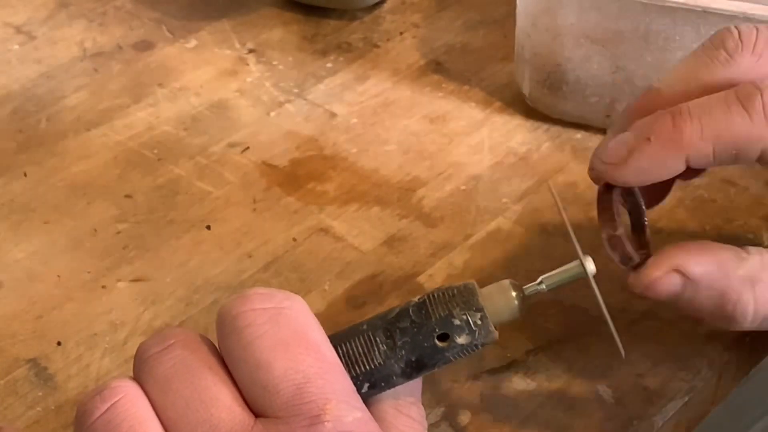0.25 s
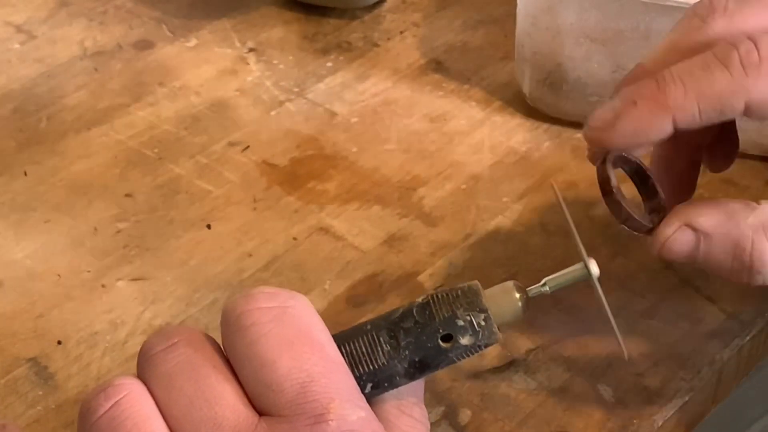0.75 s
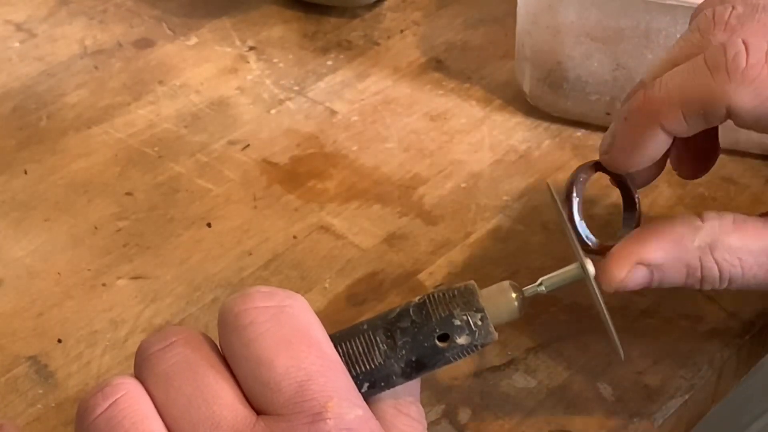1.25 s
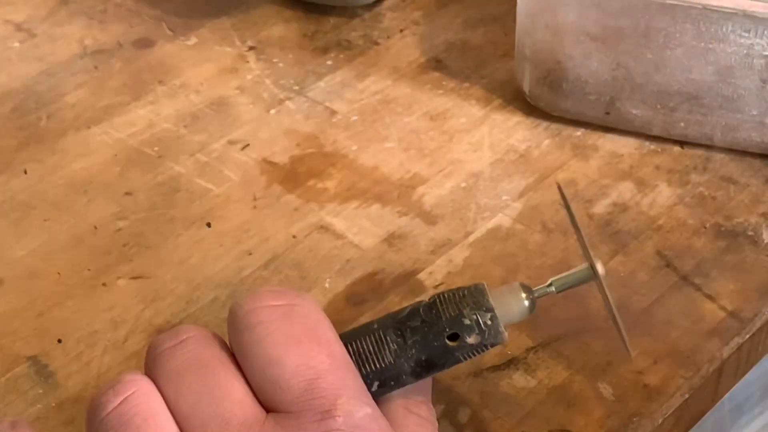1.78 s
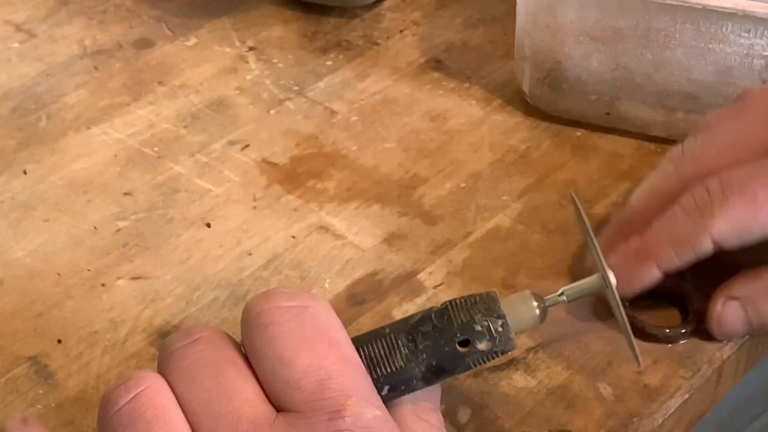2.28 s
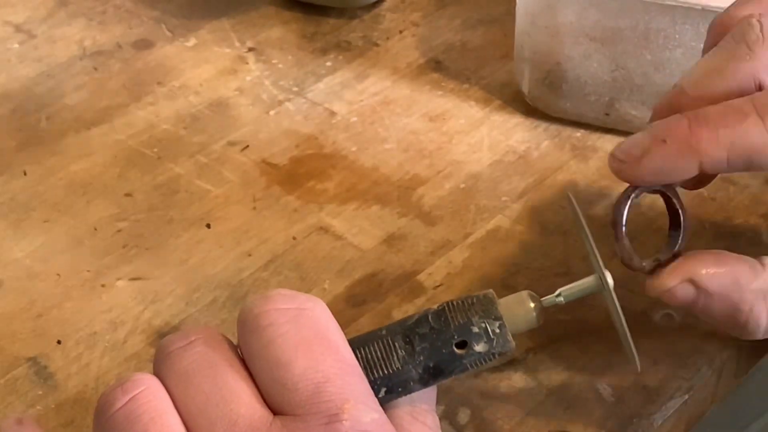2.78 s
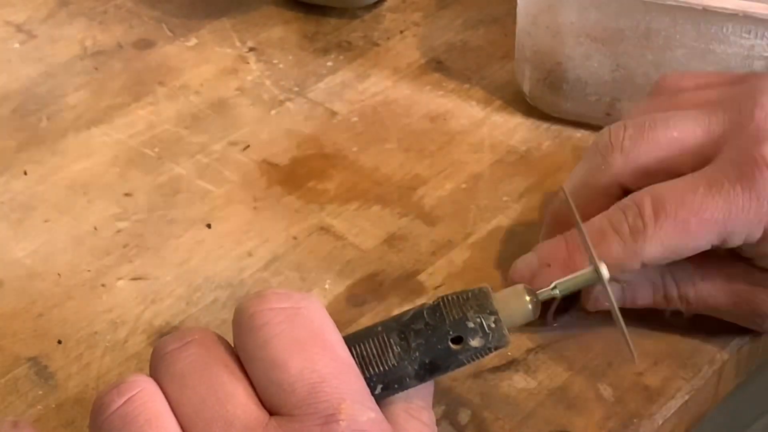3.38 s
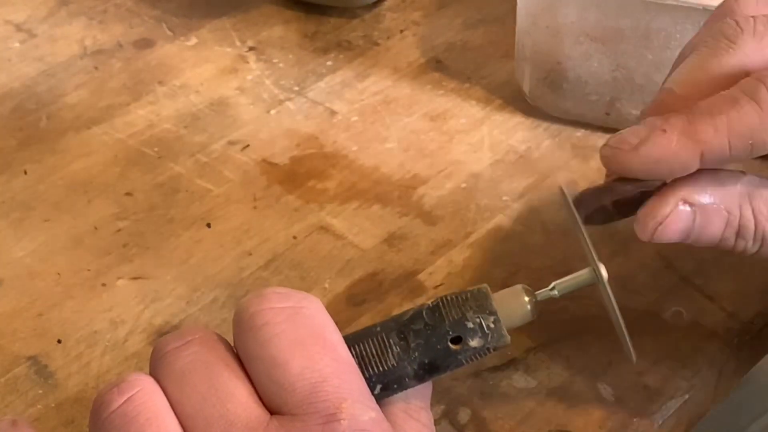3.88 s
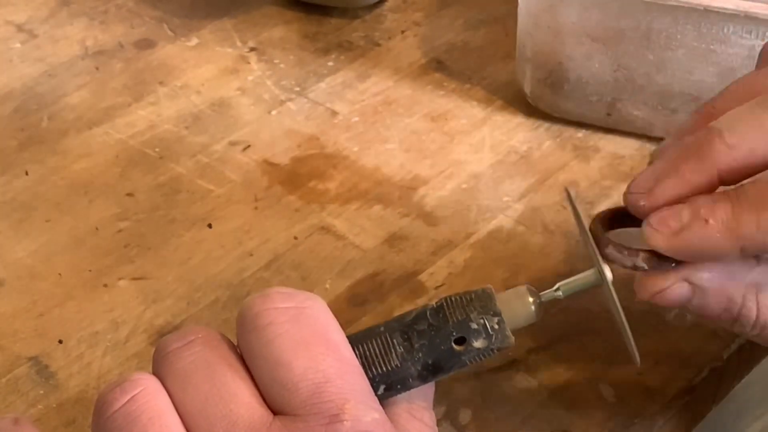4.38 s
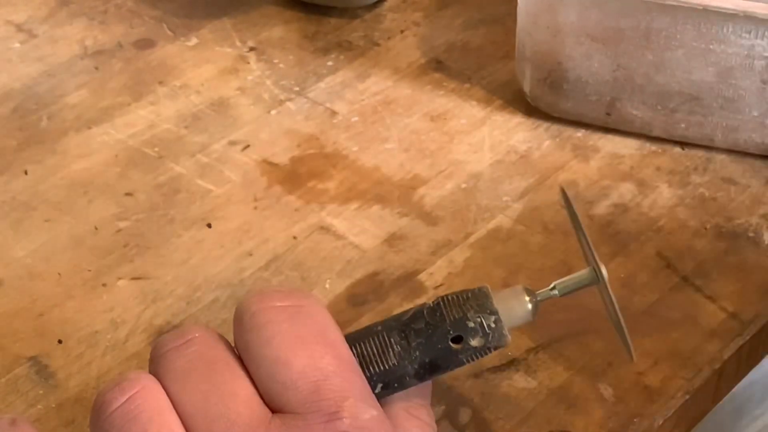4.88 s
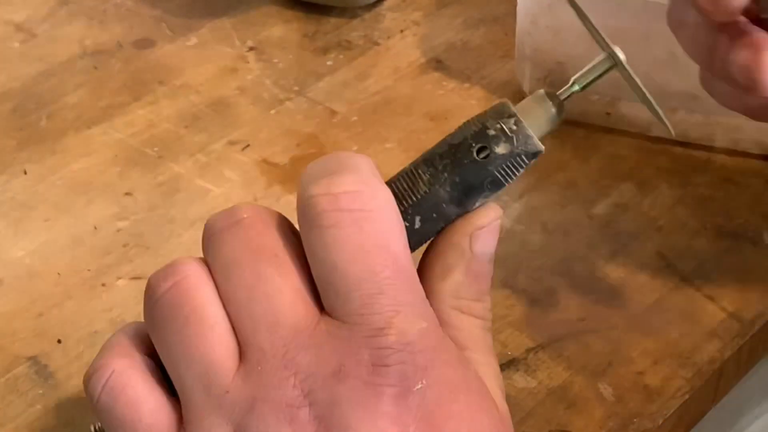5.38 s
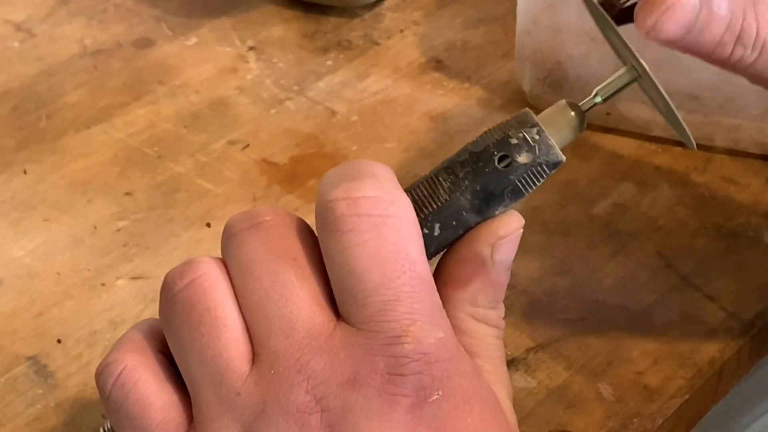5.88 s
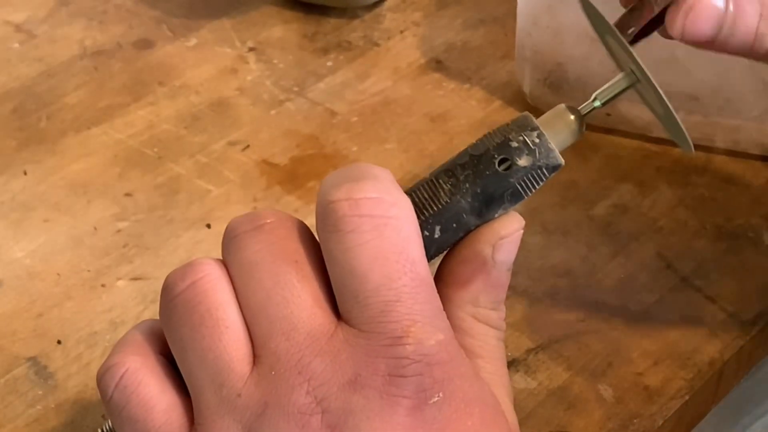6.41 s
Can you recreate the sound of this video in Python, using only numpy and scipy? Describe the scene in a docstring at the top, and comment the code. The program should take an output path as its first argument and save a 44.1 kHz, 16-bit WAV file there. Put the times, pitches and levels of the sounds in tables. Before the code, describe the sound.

A small rotary tool whines close by, sagging in pitch as its disc grinds a stone ring with gritty rasps and squeals.

```python
"""Rotary tool grinding a stone ring

A small handheld tool spins a thin abrasive disc, close by. Its shaft orders whine over
bearing tones and the hiss of cooling air. A stone ring is pressed on the disc in short
strokes: the motor drags down, grit rasps and scrapes, and the disc's modes screech and squeal."""
import sys
import numpy as np
from scipy import signal
from scipy.fft import rfft, irfft, next_fast_len
from scipy.io import wavfile
from scipy.ndimage import map_coordinates

SR = 44100
rng = np.random.default_rng(int(sys.argv[2]) if len(sys.argv) > 2 else 0)


def store_wav(level_fs):
    """Save 16-bit WAV to argv[1]."""
    pcm = np.round(np.clip(np.atleast_2d(level_fs), -1, 1) * 32767)
    wavfile.write(sys.argv[1], SR, pcm.T.astype(np.int16))


N = 293265
STEP = 32  # samples per control step

# fan hiss spectrum (frequency [Hz], relative density [dB])
AIR_SPECTRUM = [(25, -38.5), (70, -23), (130, -23.5), (260, -12), (1200, -8), (1600, -12.5), (2000, -5),
                (2500, -11.5), (3200, -13), (4000, -12.5), (4900, -7), (5900, -11), (7400, -6.5),
                (9500, -0.5), (11200, -4), (12000, -17)]
# low noise band (centre [Hz], width [Hz], gain [dB])
LOW_BAND_MODES = [(174, 26, 0)]
# left-right likeness of noise (frequency [Hz], correlation before clipping [1])
STEREO_CORRELATION = [(200, 0.99), (380, 0.91), (700, -0.061), (1400, -0.06), (1750, -0.653), (2700, -0.16),
                      (4600, 0.35), (5700, -0.29), (6400, 1), (7000, 0.23), (7900, -1.02), (8900, -1.225),
                      (9700, 0.12), (10400, 1)]
# bearing tones (shaft multiple [1], free level [dB], loaded level [dB])
BEARING_TONES = [(.72, -63, -58.5), (1.55, -61, -58), (2.55, -56.5, -55), (4.03, -55, -62),
                 (4.55, -52, -58), (5.45, -58, -58), (5.76, -47, -52), (6.5, -53.5, -58), (7.3, -58, -60),
                 (7.76, -52, -58), (8.25, -57, -58), (9.35, -56.5, -59), (10.48, -55.5, -59),
                 (11.45, -55, -58), (12.5, -54, -58), (13.45, -48, -56), (14.45, -56, -58),
                 (15.45, -57, -58), (19.4, -55, -58), (20.4, -52, -58)]
# unloaded shaft (time [s], speed [Hz])
IDLE_SPEED = [(0.1, 370.5), (0.8, 371.0), (3.2, 372.3), (3.54, 372.3), (3.95, 369.4), (4.43, 369.6),
              (5.3, 370.2), (6.0, 371.4)]
# shaft harmonics (order [1], free level [dB], loaded level [dB], left over right [dB], left lead [rad])
SHAFT_ORDERS = [(1, -52, -55, 2.5, 2), (2, -52.5, -52.5, 8.5, 0.69), (3, -53.5, -52.5, 9.5, 0.6),
                (4, -43.5, -45.5, 4.5, 0.86), (5, -50, -43.5, 2.5, -2.5), (6, -44.5, -44.5, 0, 1.2971),
                (7, -47, -52, 1.5, 2.5), (8, -44, -51, -1, 2), (9, -53.5, -43.5, -1.5, 2),
                (10, -43.5, -48.5, -2, 2), (11, -46.5, -47, -1.5, 2.5), (12, -50, -44, -0.5, -2),
                (13, -42.5, -52.5, -8.5, 0.5), (14, -41.5, -46, -5.5, 3.0), (15, -49, -52, -5, 4),
                (16, -56, -49, -11, 5), (17, -54, -51, -3, 1.5), (18, -50, -49, 0, -0.5),
                (19, -51, -54, -4, 2), (20, -56, -54, 11, 2), (21, -72, -53, -10, 2.5),
                (26, -52, -53, 0, 2.5), (28, -57, -44, 1, 1.5)]
# hum at order 1 (time [s], lift [dB])
HUM_LIFT = [(0.1, 2.5), (0.85, -1), (1.0, 13.5), (1.2, 2.5), (1.55, 8.5), (1.9, 0), (2.3, 3), (2.75, 4),
            (3.0, -8.5), (3.68, -8), (3.85, 5), (4.2, -5.5), (5.0, -4), (5.5, 3), (6.5, 1)]
# whistle at order 10 (time [s], lift [dB])
WHISTLE_LIFT = [(0.3, -3), (0.88, 2.5), (1.05, -2), (3.0, -1.5), (3.3, 0.5), (3.52, 6), (3.75, 0.5),
                (5.0, 0), (5.5, -1.5), (6.1, 0)]
# grip on the housing (time [s], tightness [-1..1])
GRIP_TIGHTNESS = [(0, 0.034), (.85, -0.16), (2.9, -0.61), (3.15, 0.31), (3.55, -0.26), (3.85, 0.74),
                  (4.65, 0.944), (4.95, -0.049), (5.5, -0.36), (6.2, -0.24)]
# orders the grip favours or damps (order [1], lift when tight [dB])
GRIP_LIFT = [(4, 4.5), (5, 5.5), (6, 5.5), (7, -5), (10, -5), (11, 2.5), (12, 0), (13, -2.5), (14, 3)]
# a hand hovers by the disc, shading the motor (start [s], end [s], attack [s], release [s], gain [dB])
HAND_HOVER = (3, 3.5, 0.04, 0.7, -3.5)
# orders that hand favours or damps (order [1], lift [dB])
HOVER_LIFT = [(2, -3.5), (5, 0), (4, 2), (10, 4), (12, 2.5), (13, -1), (14, -1.5)]
# housing resonances, lifting orders that pass (centre [Hz], width [Hz], lift [dB])
HOUSING_MODES = [(714.4, 24, 6.5), (1023, 37, 7), (1466.8, 12.6, 7), (1494, 11, 3), (1794, 49, 7),
                 (2203.3, 23, 7), (2602, 43, 6.5), (3718, 21, 3.5), (4412, 57, 10.5)]
# disc modes, lifting orders while the stone touches (centre [Hz], width [Hz], lift [dB])
SINGING_MODES = [(2400, 130, 13), (2830, 90, 12.5)]
# low disc modes (centre [Hz], width [Hz], gain [dB])
SCREECH_MODES = [(2650, 110, -13), (2850, 55, 3), (3600, 240, -16)]
# high disc modes (centre [Hz], width [Hz], gain [dB])
SQUEAL_MODES = [(8490, 170, 0), (9580, 200, -9), (10550, 220, -9)]
# abrasive hiss (frequency [Hz], relative density [dB])
RASP_SPECTRUM = [(200, -35), (1900, -30), (2500, -20), (3700, -9), (4400, -9), (5600, -1), (7400, 3),
                 (8200, 6.5), (10000, 6), (11700, 3.5), (12300, -24)]
# grit scraping the stone (frequency [Hz], relative density [dB])
SCRAPE_SPECTRUM = [(1500, -30), (2100, -9.5), (2350, -10.5), (2600, -4.5), (3100, -1.5), (3500, 0.5),
                   (4100, -3), (4700, -4.5), (5500, -8), (7000, -22)]
# stone on the disc (start [s], end [s], attack [s], start drag [Hz], end drag [Hz],
# start contact [dB], end contact [dB], screech re contact [dB], squeal re contact [dB])
STONE_PRESSES = [(0.86, 1.118, 0.066, -0.5, 10, -58, -37.5, -3, -19),
                 (1.098, 1.348, 0.08, 21, 27, -32.5, -30.5, -2.5, -13),
                 (1.35, 1.535, .035, 30, 33, -32, -31.5, -11, -4.5),
                 (1.6, 1.935, 0.0594, 23, 49, -31, -30.5, -5.5, -11),
                 (1.94, 2.07, 0.031, 0, 0, -41, -37.5, -16, -12),
                 (2.07, 2.3, 0.073, 20, 50, -27.5, -29, -6.5, -8),
                 (2.3, 2.68, 0.036, 40, 51, -29, -28.5, -6, -4),
                 (2.68, 2.8, .035, 40, 44, -29, -29.5, -3, -10),
                 (2.8, 2.854, .035, 56, 56, -28, -29, -3, -7),
                 (3.351, 3.584, 0.0498, 0, 0, -55, -55, -15, -14),
                 (6.08, 6.245, 0.089, 12, 20, -40, -33.5, -8, -14),
                 (6.244, 6.344, 0.034, 2, 2, -38, -37.5, -10, -14),
                 (6.339, 6.695, 0.052, 11, 18.5, -35.5, -37, -7.5, -14),
                 (6.493, 6.55, 0.026, 2.5, 0.5, -33.5, -38, -1, -14)]
# the disc bites an edge of the stone (start [s], end [s], scrape lift [dB], squeal lift [dB])
EDGE_BITES = [(1.36, 1.41, 3.5, 4), (1.417, 1.475, -1, 6.5), (1.77, 1.82, 3, 5), (2.22, 2.255, 0, 11.5),
              (2.81, 2.845, 1, 3)]


def amp(db):
    """Decibels to gain."""
    return 10 ** (np.asarray(db) / 20)


def unit(x):
    """x at rms 1."""
    return x / np.sqrt(np.mean(np.abs(x) ** 2) + 1e-20)


def along(points, hz):
    """(Hz, value) points read on a log axis."""
    knots_hz, values = np.transpose(points)
    return np.interp(np.log(hz + 1), np.log(knots_hz + 1), values)


def curves(rows):
    """One per-sample curve for each column after the time."""
    times_s, *columns = np.transpose(rows)
    return [np.interp(np.arange(N) / SR, times_s, column) for column in columns]


def gate(start_s, end_s, attack_s, release_s):
    """Linear attack, hold and release, 0..1."""
    t = np.arange(N) / SR
    return np.clip(np.minimum((t - start_s) / attack_s, 1 - (t - end_s) / release_s), 0, 1)


def upsample(slow):
    """Control rate to sample rate."""
    return np.interp(np.arange(N), np.arange(0, N, STEP), slow)


def slow_wobble(rate_hz):
    """Spline through random knots, at control rate."""
    knots = rng.standard_normal(4000)
    return map_coordinates(knots, [np.arange(0, N, STEP) * rate_hz / SR])


def wobble(rate_hz):
    """Smooth random curve, at sample rate."""
    return upsample(slow_wobble(rate_hz))


def flutter(width_hz):
    """Unsteady part of a tone: narrow complex noise, rms 1, at control rate."""
    return unit(slow_wobble(width_hz) + 1j * slow_wobble(width_hz))


def filtered(x, response):
    """x through a complex frequency response."""
    size = next_fast_len(N + SR // 2)
    return irfft(rfft(x, size) * response(np.fft.rfftfreq(size, 1 / SR)), size)[..., :N]


def resonances(modes, hz):
    """Complex response of parallel band-pass modes."""
    return sum(amp(db) * 1j * hz * width / (centre ** 2 - hz ** 2 + 1j * hz * width)
               for centre, width, db in modes)


def lift_db(modes, hz):
    """Resonant lift: full at each centre, half at the edges."""
    return sum(db / (1 + (2 * (hz - centre) / width) ** 2) for centre, width, db in modes)


def spread(pair, response, direct):
    """Two unrelated signals to coloured stereo, rms 1; direct sound adds correlation below 6 kHz."""
    def mixing(hz):
        share = direct * (hz < 6000)
        correlation = np.clip(share + (1 - share) * along(STEREO_CORRELATION, hz), -1, 1)
        turn_rad = np.arccos(correlation) / 2
        return response(hz) * np.array([np.cos(turn_rad), np.sin(turn_rad)])
    mid, side = filtered(pair, mixing)
    return unit(np.array([mid + side, mid - side]))


def cooling_air(shaft_rad, load, throb=0.048, hiss_db=-30.5, gust_db=0.68, low_band_db=-60, loaded_db=-4):
    """Fan hiss wavers and throbs once a turn; a low band of noise near 174 Hz weakens under load."""
    turbulence = rng.standard_normal((2, N)) * (1 + throb * np.cos(shaft_rad))
    hiss = spread(turbulence, lambda hz: amp(along(AIR_SPECTRUM, hz)), direct=0.12)
    low_band = unit(filtered(rng.standard_normal(N), lambda hz: resonances(LOW_BAND_MODES, hz) ** 2))
    return amp(hiss_db + gust_db * wobble(15)) * hiss + amp(low_band_db + loaded_db * load) * low_band


def bearings(shaft_rad, load, swell_db=2.0, phase_spread_rad=1.53):
    """Rolling balls sing fuzzy tones that track the shaft, swelling and fading."""
    out = np.zeros((2, N))
    for multiple, free_db, loaded_db in BEARING_TONES:
        level = amp(free_db + load[::STEP] * (loaded_db - free_db) + swell_db * slow_wobble(5))
        tone = upsample(level * flutter(width_hz=45)) * np.exp(1j * multiple * shaft_rad)
        out += np.real([tone, tone * np.exp(1j * rng.normal(0, phase_spread_rad))])
    return np.sqrt(2) * out


def whine(shaft_rad, speed_hz, load, touch, hover, motor_db, port_drift_db=1.2, port_drift_rad=0.4):
    """Shaft orders waver; hands and resonances lift single ones, and load roughens them."""
    controls = (speed_hz, load, touch, hover, motor_db)
    speed_hz, load, touch, hover, motor_db = (control[::STEP] for control in controls)
    grip, hum_db, whistle_db = (curves(r)[0][::STEP] for r in (GRIP_TIGHTNESS, HUM_LIFT, WHISTLE_LIFT))
    grip_db, hover_db = dict(GRIP_LIFT), dict(HOVER_LIFT)
    shaft = np.exp(1j * shaft_rad)
    out = np.zeros((2, N))
    for order, free_db, loaded_db, pan_db, lead_rad in SHAFT_ORDERS:
        upper, weak = order > 6, order in (2, 3)
        order_hz = order * speed_hz
        wander_db = 2.23 * slow_wobble(5.01) if upper else (2.0 if weak else 1.0) * slow_wobble(8)
        hands_db = grip_db.get(order, 0) * grip + hover_db.get(order, 0) * hover
        resonance_db = lift_db(HOUSING_MODES, order_hz) + touch * lift_db(SINGING_MODES, order_hz)
        swell_db = motor_db + hands_db + wander_db + resonance_db + (order == 10) * whistle_db
        level = amp(free_db + load * (loaded_db - free_db) + (hum_db if order == 1 else swell_db))
        level *= np.sqrt(2 / np.cosh(np.log(amp(pan_db))))  # constant-power pan

        roughness = 0.2 + 0.009 * order + 0.15 * weak * (1 - load) + (0.064 + 0.0502 * order) * load
        roughness = np.clip(roughness, 0, 1)
        envelope = np.sqrt(1 - roughness ** 2) + roughness * flutter(width_hz=70)
        envelope *= level * np.exp(1j * rng.uniform(0, 2 * np.pi))
        tone = shaft ** order

        # each stereo port gets its own level and phase
        width = np.clip(1 - 0.28 * hover - (0 if upper else 0.59) * load, 0, 1)
        left_path = amp(pan_db / 2) * np.exp(0.5j * lead_rad * width)
        for channel, path in enumerate((left_path, 1 / left_path)):
            if upper:  # short waves waver as the hands move
                path = path * amp(port_drift_db * slow_wobble(14))
                path = path * np.exp(1j * port_drift_rad * slow_wobble(9))
            out[channel] += np.real(upsample(envelope * path) * tone)
    return out


def disc_ringing(modes, rise_hz, chatter_db):
    """The chattering stone rings disc modes, shifted up by rise_hz; rms 1."""
    rub = rng.standard_normal((2, N)) * amp(chatter_db * wobble(70))
    ring = spread(rub, lambda hz: resonances(modes, hz), direct=0.59)
    analytic = signal.hilbert(ring, next_fast_len(N))[..., :N]
    return np.real(analytic * np.exp(2j * np.pi * np.cumsum(rise_hz) / SR))


def pressing(release_s=0.035):
    """Stone on the disc: touch (0..1), shaft drag [Hz], then contact, screech and squeal [dB]."""
    touch, drag_hz, contact, screech, squeal = np.zeros((5, N))
    for start_s, end_s, attack_s, from_hz, to_hz, from_db, to_db, screech_db, squeal_db in STONE_PRESSES:
        held = gate(start_s, end_s, attack_s, release_s)
        pull_hz, rub_db = curves([(start_s, from_hz, from_db), (end_s, to_hz, to_db)])
        rub = held * amp(rub_db)
        touch = np.minimum(touch + held, 1)
        drag_hz += held * pull_hz
        contact += rub
        screech += rub * amp(screech_db)
        squeal += rub * amp(squeal_db)
    return touch, drag_hz, *(20 * np.log10(level + 1e-6) for level in (contact, screech, squeal))


def biting(ramp_s=0.016):
    """The disc bites an edge of the stone: scrape lift and squeal lift [dB]."""
    return sum(np.outer(lifts_db, gate(start_s, end_s, ramp_s, ramp_s))
               for start_s, end_s, *lifts_db in EDGE_BITES)


def grit(shaft_rad, bedded, grains_per_turn=96, kept_per_turn=0.68):
    """Grains return each turn and wear away, a gritty buzz; a bedded-in stone rubs without pitch."""
    fresh = rng.standard_normal((2, 2700, grains_per_turn))  # channel, turn, grain
    rims = signal.lfilter([1], [1, -kept_per_turn], fresh, axis=1).reshape(2, -1)
    position = shaft_rad / (2 * np.pi) * grains_per_turn
    buzz = unit(np.array([np.interp(position, np.arange(len(rim)), rim) for rim in rims]))
    return np.sqrt(1 - bedded ** 2) * buzz + bedded * rng.standard_normal((2, N))


def grinding(shaft_rad, bedded, bite_db, strikes_per_s=16000, runout=0.09, chatter_db=1.4, rasp_db=-1.5):
    """Grit rasps and scrapes unevenly on the stone, scraping harder where the disc bites."""
    strikes = rng.standard_normal((2, N)) * (rng.random((2, N)) < strikes_per_s / SR)
    strikes *= (1 + runout * np.cos(shaft_rad)) * amp(chatter_db * wobble(45))
    rasp = spread(strikes, lambda hz: amp(along(RASP_SPECTRUM, hz)), direct=0.51)
    rub = grit(shaft_rad, bedded) * amp(chatter_db * wobble(60))
    scrape = spread(rub, lambda hz: amp(along(SCRAPE_SPECTRUM, hz)), direct=0.11)
    scrape_db = -6 - 1.5 * bedded + bite_db + wobble(16)
    return amp(rasp_db) * rasp + amp(scrape_db) * scrape


def scene(inertia_s=0.088, full_load_hz=25, light_hz=352, bedded_hz=322, recover_s=0.071, labour_hz=48,
          idle_db=-1.0, whine_labour_db=-6.5, rush_labour_db=-8):
    """One shaft drives everything; presses slow it raggedly, and the labouring motor grows quiet."""
    touch, drag_hz, contact_db, screech_db, squeal_db = pressing()
    bite_scrape_db, bite_squeal_db = biting()
    pole = np.exp(-1 / (inertia_s * SR))
    sag_hz = signal.lfilter([1 - pole], [1, -pole], drag_hz)
    speed_hz = curves(IDLE_SPEED)[0] - sag_hz
    load = np.clip(sag_hz / full_load_hz, 0, 1)
    bedded = np.clip((light_hz - speed_hz) / (light_hz - bedded_hz), 0, 1)  # 1: stone bedded in
    jitter_hz = 0.45 * wobble(35) + 1.4 * touch * load * wobble(50)
    shaft_rad = 2 * np.pi * np.cumsum(speed_hz + jitter_hz) / SR

    *timing_s, shade_db = HAND_HOVER
    hover = gate(*timing_s)
    motor_db = idle_db + shade_db * hover
    late_sag_hz = np.interp(np.arange(N) - recover_s * SR, np.arange(N), sag_hz)
    labour = np.abs(np.maximum(sag_hz, late_sag_hz) / labour_hz) ** 3

    tones = whine(shaft_rad, speed_hz, load, touch, hover, motor_db + whine_labour_db * labour)
    rush = bearings(shaft_rad, load) + cooling_air(shaft_rad, load)
    screech = disc_ringing(SCREECH_MODES, rise_hz=90 * (1 - bedded), chatter_db=1.5)
    squeal = disc_ringing(SQUEAL_MODES, rise_hz=210 * (1 - bedded), chatter_db=3.0)
    motor = tones + amp(motor_db + rush_labour_db * labour) * rush
    disc = amp(screech_db) * screech + amp(squeal_db + bite_squeal_db) * squeal
    return motor + disc + amp(contact_db) * grinding(shaft_rad, bedded, bite_scrape_db)


def record(dry, cutoff_hz=12120):
    """Brick-wall low-pass."""
    return filtered(dry, lambda hz: hz < cutoff_hz)


dry = scene()
out = record(dry)
store_wav(out)
```